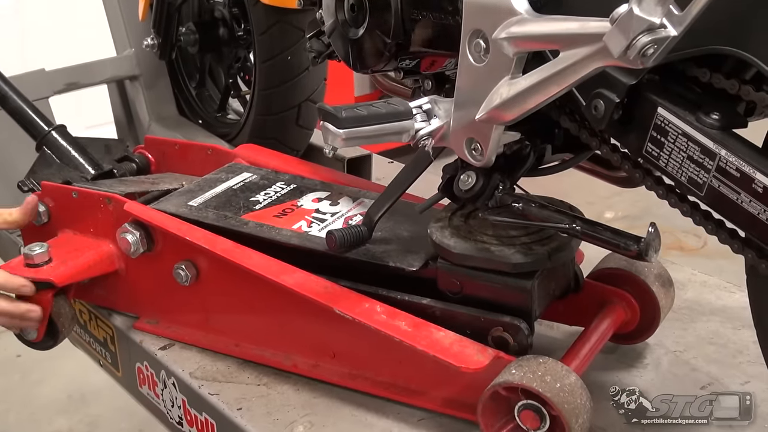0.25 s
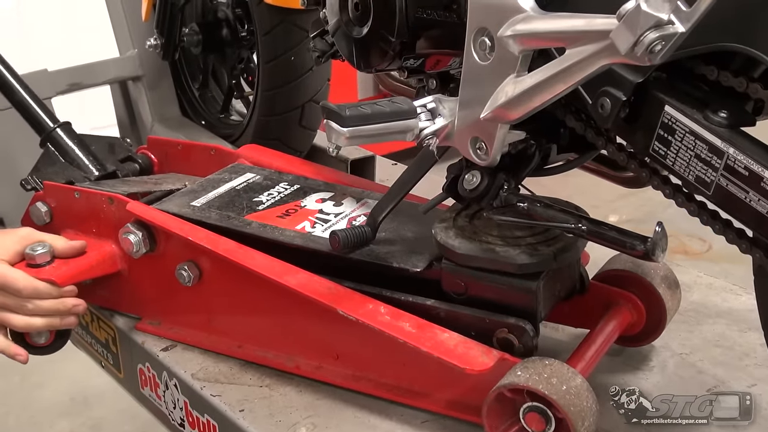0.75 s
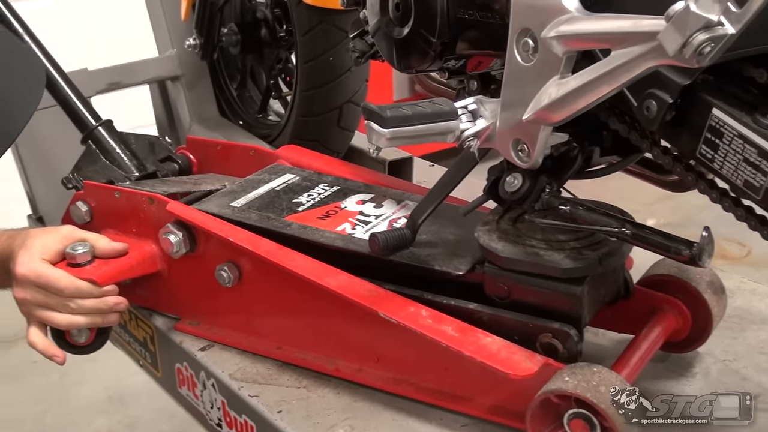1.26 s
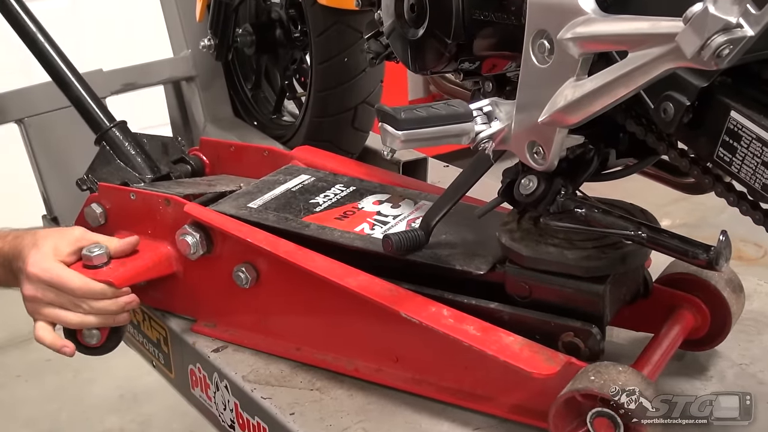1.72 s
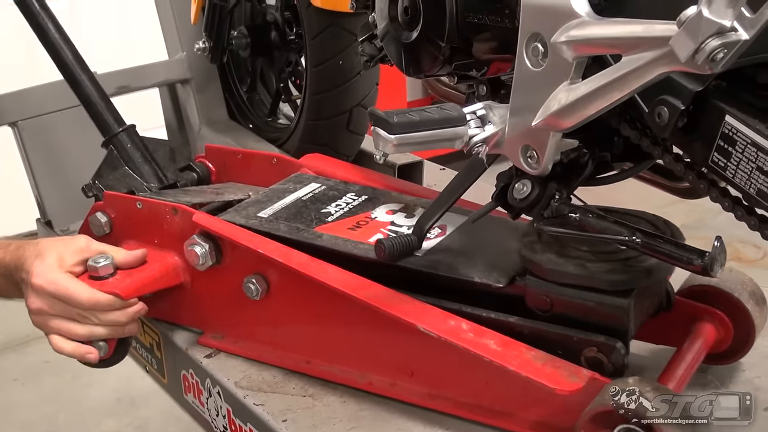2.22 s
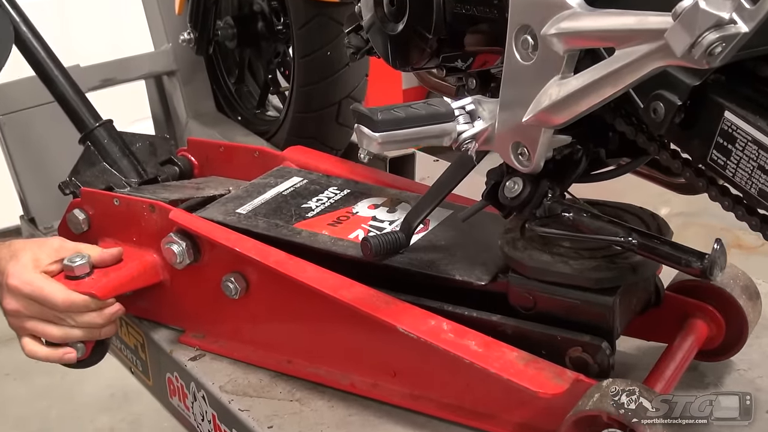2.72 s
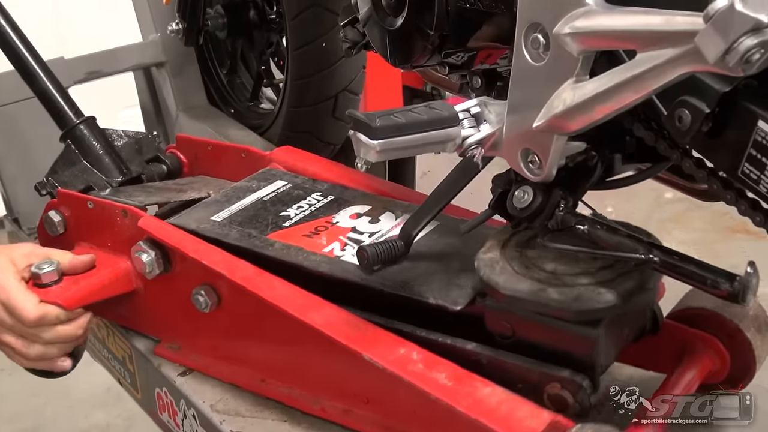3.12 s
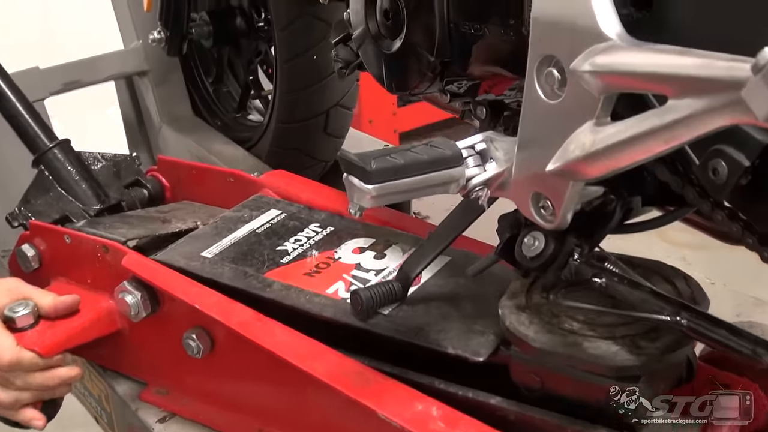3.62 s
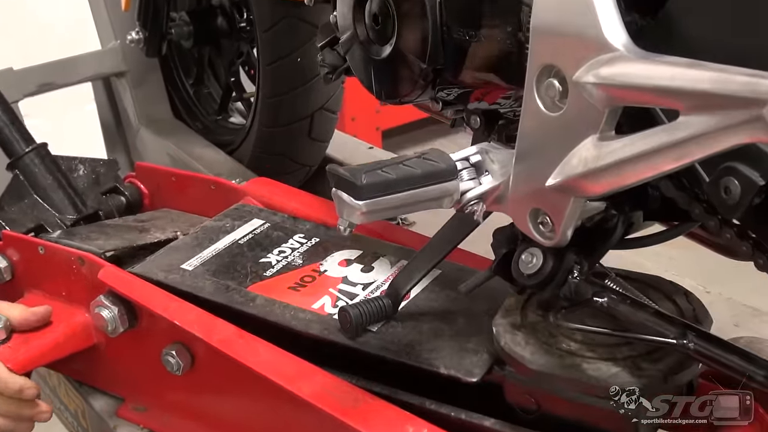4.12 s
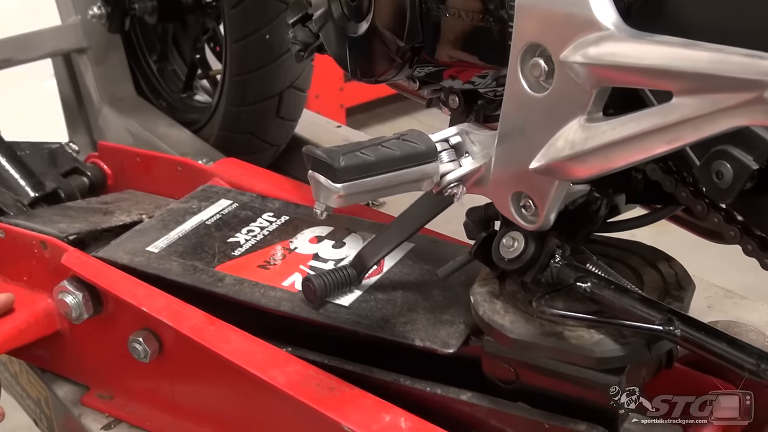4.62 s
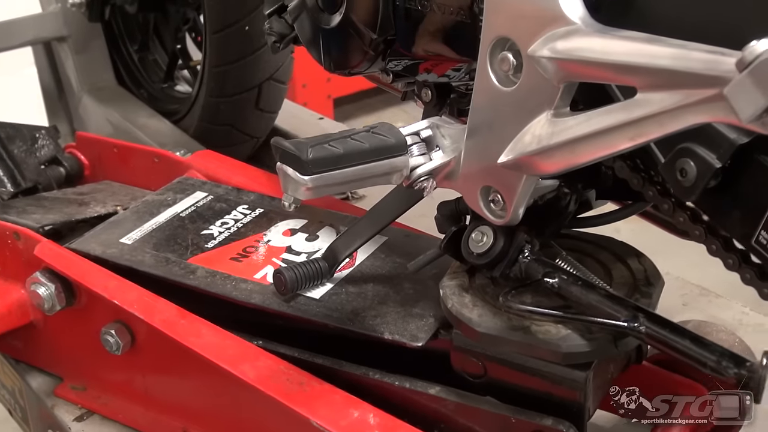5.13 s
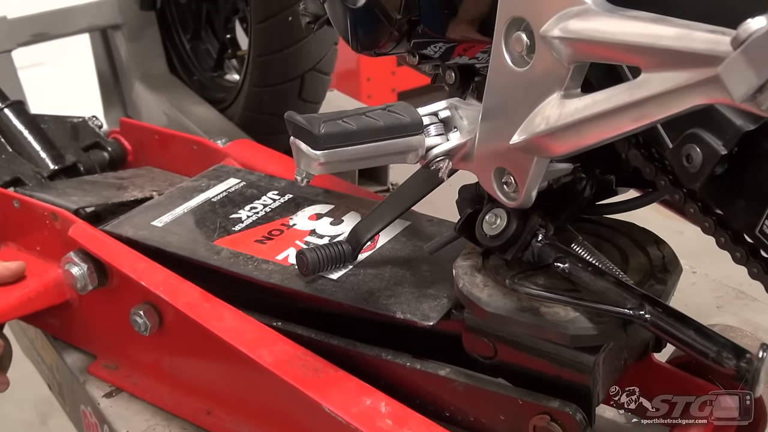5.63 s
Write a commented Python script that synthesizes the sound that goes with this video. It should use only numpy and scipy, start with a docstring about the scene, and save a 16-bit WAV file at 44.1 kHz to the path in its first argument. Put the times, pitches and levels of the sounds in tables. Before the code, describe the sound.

Irregular metallic clunks and knocks ring in a hard workshop as a floor jack's wheels rumble and scrape over a gritty steel bench.

```python
"""A steel floor jack is dragged about on a steel workshop bench, in a hard room that rings after each blow.
From the start its wheels rumble and scrape over room tone and hum. The frame clunks, castors tick, grit
brushes and a pin chinks. The castors judder near 1.6 s; after 2 s comes a run of clunks, with a jingling
washer and the heaviest roll. A hard clunk lands at 3.6 s, a rubber sole squeaks once at 4.6 s, and light
knocks trail off. One microphone feeds both channels, each with a faint hiss of its own."""
import sys
import numpy as np
from scipy import signal
from scipy.fft import rfft, irfft, next_fast_len
from scipy.io import wavfile
from scipy.ndimage import map_coordinates

SR = 44100
rng = np.random.default_rng(int(sys.argv[2]) if len(sys.argv) > 2 else 0)


def output_pcm(signal):
    """Save a mono or channel-first signal as 16-bit PCM at the path in sys.argv[1].

    Samples are clipped to [-1, 1] before scaling.
    """
    pcm = np.clip(np.atleast_2d(signal).T, -1, 1) * 32767
    wavfile.write(sys.argv[1], SR, np.round(pcm).astype(np.int16))


N = 258558

# Room tone spectrum: f/Hz, level/dB
AIR_SPECTRUM = [(15, 3), (28, 7), (45, -5), (70, 0.5), (150, -7), (400, -14), (1000, -16.5), (2000, -29.5),
                (3500, -31), (5000, -53), (10000, -37), (16000, -42)]
# Fader moves for the wheels on the bench: t/s, rumble/dB, scrape/dB, grit/dB
ROLL_FADERS = [(0.0, -62.5, -59, -67), (0.36, -54, -64, -72), (0.52, -45, -47, -58),
               (0.78, -66.5, -58.5, -73), (1.06, -59, -73, -75.5), (1.4, -65, -62, -71),
               (1.63, -57, -45.5, -58), (1.84, -60.5, -53.5, -66), (2.09, -37.5, -57, -80),
               (2.24, -29.5, -43.5, -49), (2.45, -42, -53, -76), (2.71, -69.5, -49.5, -57.5),
               (2.97, -53.5, -61, -60.5), (3.15, -39, -47.5, -53.5), (3.36, -52, -57.5, -66.5),
               (3.93, -48.5, -60, -77), (4.26, -52.5, -75, -75.5), (4.51, -56, -59.5, -67),
               (4.7, -50.5, -56.5, -63.5), (5.22, -60.5, -64.5, -72), (5.45, -50.5, -73, -76),
               (5.86, -57.5, -68, -74)]
# Resonances of frame and bench: f/Hz, level/dB, t60/s
FRAME_MODES = [(86, -1.5, 0.76), (124.2, -2, 0.54), (171, 0, 0.23), (239, -5.5, 0.073), (330.5, -2.5, 0.13),
               (437.9, 3.5, 0.24), (498, 0.5, 0.17), (812, -9.5, 0.32), (896, -12, 0.26), (1044, -11, 0.11),
               (1257, -1.5, 0.34), (1361, -5, 0.072), (1426, -3, 0.11), (1507, -9, 0.058),
               (1704.1, 4, 0.076), (2004, -4.5, 0.25), (2170, -16, 0.1), (3074, -2.5, 0.12),
               (3314, 1.5, 0.23), (3614, -5.5, 0.2)]
# Spectra of the scrape, the grit and the finest grit under the wheels: f/Hz, level/dB
SCRAPE_SPECTRUM = [(760, -21), (1300, -9), (1490, -6), (1950, 0.5), (2760, 6), (3550, 9), (9000, -33),
                   (11700, -37), (19800, -120)]
GRIT_SPECTRUM = [(3000, -15), (5000, 4.5), (6500, -4.5), (9000, -6.5), (13000, -32)]
FINE_SPECTRUM = [(7000, -27), (10000, -10), (13000, -4), (16000, 2)]
# Blows on the frame: t/s, clank peak/dB, boom f/Hz, boom/dB, body/dB, bite/dB, contact t60/s, ring/dB
# (boom, body and bite are relative to the clank, the ring to the contact noise)
FRAME_BLOWS = [(0.1028, -49, 198, 14.5, -8, -4, 0.089, -16), (0.2647, -42.5, 225, 4.5, 4.5, -3, 0.02, -47),
               (0.3385, -23, 117.6, -18, -12, 0, 0.056, -22), (0.508, -17, 192, -22, -10, 1, 0.031, -28.5),
               (1.009, -46, 156, 2, -1, -11, 0.072, -34), (1.673, -40, 111, 2, -20, 10, 0.048, -21),
               (1.8838, -18.5, 99, -22, -6, -14, 0.037, -27),
               (2.0363, -16, 188, -14.5, -8, -8.5, 0.019, -16.5),
               (2.0704, -22.5, 208, 0.5, -6, -3, 0.037, -29), (2.1076, -18, 244, 0.5, -3.5, -3, 0.043, -23),
               (2.1164, -24.5, 229, -5, -6, -10, 0.017, -22), (2.167, -20, 192, -6.5, -7, -5.5, 0.037, -15),
               (2.1744, -28.5, 231, 2.5, -8, 1, 0.03, -48), (2.2319, -19, 213, -17, -2.5, -7, 0.049, -27),
               (2.2442, -25, 116, -7.5, -26, -9, 0.039, -33), (2.317, -30, 198, 2, 1, -8, 0.024, -38),
               (2.4272, -30, 240, -6.5, -7.5, -4, 0.079, -23), (2.8607, -51, 75.4, 1, -4, 3, 0.077, -21),
               (3.1017, -40.5, 196, 1, -1.5, 5.5, 0.17, -28),
               (3.6127, -14, 181, -11.5, -3, -10.5, 0.032, -20),
               (3.9734, -29.5, 195, -6, 0.5, -1.5, 0.022, -24), (4.081, -34, 75.4, -29, -16, 5, 0.015, -39),
               (4.1866, -53, 95, 9, 5, 3.5, 0.018, -21), (4.3009, -64.5, 172, 26.5, -3, -9, 0.029, -26),
               (4.4433, -52.5, 147, 4.5, 15.5, -16, 0.047, -23),
               (4.4636, -41.5, 248, 6.5, -0.5, -17, 0.037, -21), (4.699, -39.5, 186, 6.5, 3, 9, 0.038, -29),
               (4.8551, -42.5, 74.5, -4.5, 7, 7.5, 0.071, -24.5), (5.03, -51, 157, 0, 8, -13, 0.028, -41),
               (5.2856, -45, 170, 8.5, 17.5, -7, 0.054, -17),
               (5.3096, -39.5, 102.3, -0.5, -6, -12, 0.036, -21),
               (5.3295, -50, 104, 16.5, 17.5, -2, 0.042, -29),
               (5.4105, -36.5, 85, -9, 4.5, 5.5, 0.018, -48), (5.4775, -44, 238, 8.5, 13, -17, 0.039, -39),
               (5.5687, -54, 114, 1, 7.5, -2, 0.052, -21), (5.71, -52, 75.4, 0, 2, -1.5, 0.057, -25)]
# The bands of a blow (body, clunk, clank, bite, edge, spit): low f/Hz, high f/Hz
BLOW_BANDS = [(300, 600), (800, 1500), (1500, 2250), (2850, 4200), (4300, 7000), (7000, 13500)]
# Clunk, edge and spit relative to the clank: offset/dB, dB per dB of body, dB per dB of bite
BAND_LINKS = [(-0.5, 0.22, -0.1), (-11.5, 0.1, 1.22), (-19.5, .05, 1.8)]
# Short ticks: a light knock at 0.33 s, then a castor slipping round in jerks: t/s, peak/dB, 2 kHz note relative
# to the peak/dB
TICKS = [(0.328, -45, 6), (1.1868, -48.5, -7), (1.51, -43.5, 4), (1.5255, -40, -9),
         (1.5637, -35, -9), (1.576, -35, -20), (1.584, -33.5, -6), (1.5938, -31.5, -4),
         (1.6034, -40, -15), (1.6154, -49, -2), (1.6495, -30.5, 1), (1.6615, -40, -5),
         (1.67, -36, 3), (1.6851, -29, -4), (1.6936, -30, 1.5), (2.6176, -37, -12),
         (3.4161, -47, -7), (3.927, -53, -8), (4.516, -45.5, 0.5), (5.3937, -54, -8),
         (5.7348, -52.5, 3)]
# Dry brushes and slides of grit: t/s, length/s, low f/Hz, high f/Hz, level/dB
GRIT_SLIDES = [(.4, 0.1, 2500, 11900, -48.5), (1.39, 0.27, 2780, 10000, -57),
               (2.092, 0.044, 6000, 15000, -47), (2.238, 0.019, 6000, 15000, -51.5),
               (2.305, .025, 7000, 15000, -54), (2.366, 0.043, 5000, 15000, -46),
               (2.617, 0.18, 3200, 6400, -52), (3.045, 0.24, 3000, 10800, -52.5),
               (3.097, 0.031, 2500, 15000, -45.5), (3.498, 0.14, 5000, 14900, -62.5),
               (4.672, 0.019, 3000, 15000, -51), (4.698, 0.093, 2500, 8800, -48),
               (4.902, 0.022, 4500, 15000, -56), (5.069, 0.067, 2500, 12000, -57.5),
               (5.816, 0.034, 5400, 15000, -60)]
# Strikes on a loose pin and a loose washer: t/s, ring/dB, spit/dB, brightness/(dB per octave)
PIN_STRIKES = [(.448, -48, -62, -2), (.468, -53, -42, 4), (.509, -51, -50, -2)]
WASHER_STRIKES = [(2.13, -44.5, -47, 2), (2.26, -55, -58, -7), (2.305, -49, -34.5, 6),
                  (2.377, -42, -35.5, 0), (4.083, -69, -55, -18), (4.135, -62, -57, 4)]
# Their resonances: f/Hz, level/dB, t60/s
PIN_MODES = [(2160, -4, .6), (2945, -1, .2), (3860, 0, 1.0), (5830, -5, .7), (7760, -10, .35),
             (11700, -14, .2), (15000, -13, .08)]
WASHER_MODES = [(5200, -1, 0.092), (6660, 0, 0.13), (8150, -11, 0.27), (10000, -16, 0.3),
                (12000, -14, 0.072)]
# Rubber sticking and slipping: t/s, slip rate/Hz, level/dB
SOLE_SLIPS = [(4.619, 2700, -44), (4.624, 2390, -43), (4.633, 2650, -46), (4.635, 3300, -44),
              (4.643, 3700, -48), (4.648, 4000, -66), (4.657, 3600, -62), (4.660, 2750, -44),
              (4.668, 2480, -43), (4.680, 1700, -39), (4.698, 900, -43)]
# Decay of the hard room: f/Hz, t60/s
ROOM_DECAY = [(100, 1), (300, 0.39), (1000, 1), (3500, 0.82), (6000, 0.36), (12000, 0.49)]
# Channel hiss spectrum: f/Hz, level/dB
HISS_SPECTRUM = [(18, -41), (30, -13), (581, -4), (1240, -14), (1790, -18), (3030, -22), (4370, -11.5),
                 (5390, -3), (13900, 2.5), (15800, -14)]

AIR_DB, HUM_HZ, HUM_DB = -54, 59.5, -57
DRUM_DB, DRUM_FROM_RUMBLE = -1, 0.24  # midrange drumming rides a blend of the rumble and scrape faders
FINE_DB, FINE_FOLLOW = -74.5, 0.42  # finest grit: mean level, dB per dB of grit
TICK_TREBLE_DB, TICK_T60_S = -18, 0.022
EVEN_HZ, RAGGED_HZ, SQUEAK_FADE_S = 2500, 1100, .003  # fast slips are even, slow ones ragged
TOP_HZ = 15900


def amp(db):
    """Gain of a level in dB."""
    return 10 ** (np.asarray(db) / 20)


def unit(x):
    """x at rms 1."""
    return x / np.sqrt(np.mean(x ** 2) + 1e-20)


def along(points, hz):
    """(f/Hz, value) points read on a log frequency axis."""
    f, values = np.transpose(points)
    return np.interp(np.log(hz + 1), np.log(f + 1), values)


def curves(rows):
    """One value per sample for each column after the time."""
    times, *columns = np.transpose(rows)
    return [np.interp(np.arange(N) / SR, times, column) for column in columns]


def wobble(rate):
    """A smooth random curve, rate knots a second."""
    return map_coordinates(rng.standard_normal(int(N * rate / SR) + 4), [np.arange(N) * rate / SR])


def filtered(x, response):
    """x through an EQ given as a complex response of frequency."""
    size = next_fast_len(N + SR // 2)
    return irfft(rfft(x, size) * response(np.fft.rfftfreq(size, 1 / SR)), size)[..., :N]


def noise(spectrum, spiky_db=0, rate=300):
    """Coloured noise of rms 1 whose level flickers by spiky_db, rate times a second."""
    grains = amp(spiky_db * wobble(rate)) * rng.standard_normal(N)
    return unit(filtered(grains, lambda hz: amp(along(spectrum, hz))))


def band(x, edges):
    """The part of x between two edges in Hz, peak 1."""
    part = signal.sosfilt(signal.butter(3, edges, "bandpass", fs=SR, output="sos"), x)
    return part / np.abs(part).max()


def add(out, start, x):
    """Mix x into out from start, in seconds."""
    piece = out[round(start * SR):][:len(x)]
    piece += x[:len(piece)]


def room_tone():
    """The bed: still air and a mains hum that wavers in level."""
    waver = amp(2.5 * wobble(5))
    hum = amp(HUM_DB) * waver * np.sqrt(2) * np.sin(2 * np.pi * HUM_HZ * np.arange(N) / SR)
    return amp(AIR_DB + 0.44 * wobble(0.73)) * noise(AIR_SPECTRUM) + hum


def frame_drumming(x, lo_hz, hi_hz, spread):
    """x through the frame modes in a range, widened by the rolling contact and alternating in sign."""
    modes = [(hz, db, spread / t60) for hz, db, t60 in FRAME_MODES if lo_hz < hz < hi_hz]

    def response(f):
        return sum((-1) ** k * amp(db) * 1j * f * width / (hz * hz - f * f + 1j * f * width)
                   for k, (hz, db, width) in enumerate(modes))
    return unit(filtered(x, response))


def rolling_wheels():
    """Bumps under the wheels drum the frame; dust scrapes and crunches in patches."""
    rumble_db, scrape_db, grit_db = curves(ROLL_FADERS)
    drum_db = DRUM_DB + DRUM_FROM_RUMBLE * rumble_db + (1 - DRUM_FROM_RUMBLE) * scrape_db
    fine_db = FINE_DB + FINE_FOLLOW * (grit_db - grit_db.mean())
    bumps = amp(3 * wobble(25)) * rng.standard_normal(N)
    rumble = amp(rumble_db) * frame_drumming(bumps, 50, 290, spread=14.5)
    drum = amp(drum_db) * frame_drumming(rng.standard_normal(N), 290, 1700, spread=20.4)
    scrape = amp(scrape_db) * noise(SCRAPE_SPECTRUM, spiky_db=1.6)
    grit = amp(grit_db) * noise(GRIT_SPECTRUM, spiky_db=1.6)
    fine = amp(fine_db) * noise(FINE_SPECTRUM, spiky_db=1.6)
    patches = amp(1.2 * wobble(40))
    return rumble + drum + patches * (scrape + grit + fine)


def steel_ring(modes, t, scatter_db, blur):
    """Struck modes die away from random strengths, their phases wandering, the high ones most."""
    hz, db, t60 = np.transpose(modes)[..., None]
    db = db + scatter_db * rng.standard_normal(hz.shape)
    drift = blur * hz / SR * np.cumsum(rng.standard_normal((len(hz), len(t))), axis=1)
    return np.sum(amp(db - 60 * t / t60) * np.sin(2 * np.pi * hz * t + drift), axis=0)


def frame_clunks():
    """Each blow is a rattling contact plus the ringing frame, balanced over a boom and six bands."""
    out, t = np.zeros(N), np.arange(SR * 2 // 5) / SR
    attack = 1 - np.exp(-t / .0005)
    for start, clank_db, boom_hz, boom_db, body_db, bite_db, t60, ring_db in FRAME_BLOWS:
        rattle = rng.standard_normal(len(t)) * attack
        rattle[round(.001 * SR)] -= 5  # the first touch is one hard spike
        tones = amp(ring_db) * steel_ring(FRAME_MODES, t, scatter_db=3.5, blur=1.29) * attack
        clunk_db, edge_db, spit_db = np.dot(BAND_LINKS, [1, body_db, bite_db])
        bands = [(boom_hz / 1.307, boom_hz * 1.372)] + BLOW_BANDS
        levels = clank_db + np.array([boom_db, body_db, clunk_db, 0, bite_db, edge_db, spit_db])
        decays = t60 * np.array([2.06, 1.32, 2.5, 1.5, 0.94, 2.0, 1.1])  # each band scales the t60
        blow = sum(amp(level) * band(rattle * amp(-60 * (t / decay) ** 1.15) + tones, edges)
                   for level, decay, edges in zip(levels, decays, bands))
        add(out, start - .001, room_reverb(blow, wet_db=-10))
    return out


def room_reverb(x, wet_db):
    """x plus a fresh noise tail from the hard room, each frequency dying at its own speed."""
    hz, t, spectra = signal.stft(rng.standard_normal(SR * 3 // 4), SR, nperseg=256)
    tail = signal.istft(spectra * amp(-60 * t / along(ROOM_DECAY, hz)[:, None]), SR, nperseg=256)[1]
    predelayed = np.pad(x, (300, 0))
    wet = signal.fftconvolve(predelayed, tail / np.linalg.norm(tail))
    return amp(wet_db) * wet + np.pad(x, (0, len(wet) - len(x)))


def castor_ticks():
    """Each tick, a light knock or a jerk of a castor, is a short burst with a note near 2 kHz; close together
    they judder."""
    out, t = np.zeros(N), np.arange(SR // 8) / SR
    attack = 1 - np.exp(-t / 0.00038)
    for start, db, note_db in TICKS:
        burst = rng.standard_normal(len(t)) * amp(-60 * t / TICK_T60_S) * attack
        treble = amp(TICK_TREBLE_DB) * band(burst, BLOW_BANDS[-1])
        note = amp(note_db) * band(burst, (1600, 2400))
        tick = band(burst, (2800, 6800)) + treble + note
        add(out, start - .001, room_reverb(amp(db) * tick, wet_db=-9.5))
    return out


def grit_brushes():
    """Sliding grit: dry treble noise with quick fades and a softened top."""
    out = np.zeros(N)
    for start, length, lo_hz, hi_hz, db in GRIT_SLIDES:
        swell = np.hanning(round(length * SR)) ** 0.19
        dust = signal.lfilter([1], [1, -.5], rng.standard_normal(len(swell)))
        add(out, start, amp(db) * swell * unit(band(dust, (lo_hz, hi_hz))))
    return out


def chinks(strikes, modes):
    """A small loose steel part is struck: a thin ring and a bright spit of noise."""
    out, t = np.zeros(N), np.arange(SR * 3 // 4) / SR
    pivot_hz = modes[1][0]  # brightness tilts about the second mode
    for start, ring_db, spit_db, tilt in strikes:
        tilted = [(hz, db + tilt * np.log2(hz / pivot_hz), t60) for hz, db, t60 in modes]
        spit = amp(spit_db) * band(rng.standard_normal(len(t)) * amp(-60 * t / 0.039), BLOW_BANDS[-1])
        ring = amp(ring_db) * steel_ring(tilted, t, scatter_db=1.5, blur=.9)
        add(out, start, room_reverb(ring + spit, wet_db=-8))
    return out


def sole_squeak():
    """Rubber sticks and slips: a stack of overtones that turns ragged as the sole slows down."""
    (start, first_hz, _), (end, last_hz, _) = SOLE_SLIPS[0], SOLE_SLIPS[-1]
    fade_in, fade_out = (start - SQUEAK_FADE_S, first_hz, -120), (end + SQUEAK_FADE_S, last_hz, -120)
    slip_hz, db = curves([fade_in] + SOLE_SLIPS + [fade_out])
    ragged = np.clip((EVEN_HZ - slip_hz) / (EVEN_HZ - RAGGED_HZ), 0, 1) ** 2
    jitter = (.025 + .25 * ragged) * wobble(900)
    phase = 2 * np.pi * np.cumsum(slip_hz * (1 + jitter)) / SR
    stack = sum(amp(-1.5 * k) * np.sin(k * phase + k * k) * (k * slip_hz < TOP_HZ) for k in range(1, 13))
    presence_eq = [(500, -10), (2000, 7.5), (4000, 8.0), (12000, 1.0), (15000, -8)]  # f/Hz, gain/dB
    squeak = filtered(stack, lambda hz: amp(along(presence_eq, hz)))
    return room_reverb(amp(db - 3.5) * squeak, wet_db=-6.5)[:N]


def scene():
    """All layers meet at one microphone, which feeds both channels."""
    loose_parts = chinks(PIN_STRIKES, PIN_MODES) + chinks(WASHER_STRIKES, WASHER_MODES)
    jack = frame_clunks() + castor_ticks() + loose_parts + rolling_wheels()
    mono = jack + grit_brushes() + sole_squeak() + room_tone()
    return np.array([mono, mono])


def record(dry):
    """Each channel adds its own hiss, then a brick-wall low-pass cuts the top."""
    hiss = amp(-73) * np.array([noise(HISS_SPECTRUM), noise(HISS_SPECTRUM)])
    return filtered(dry + hiss, lambda hz: hz < TOP_HZ)


dry = scene()
out = record(dry)
output_pcm(out)
```